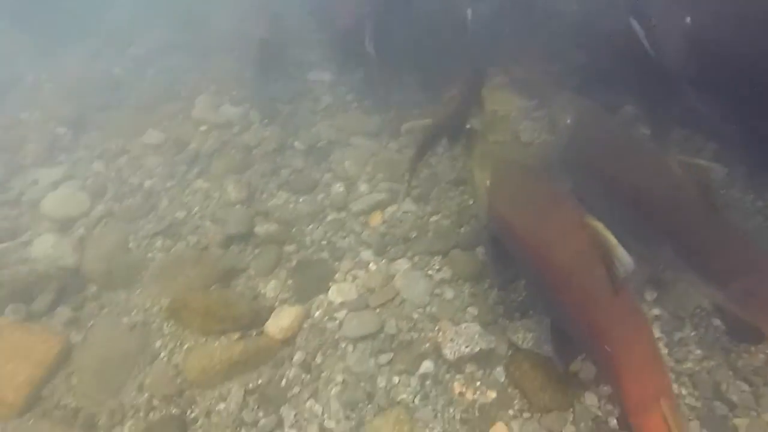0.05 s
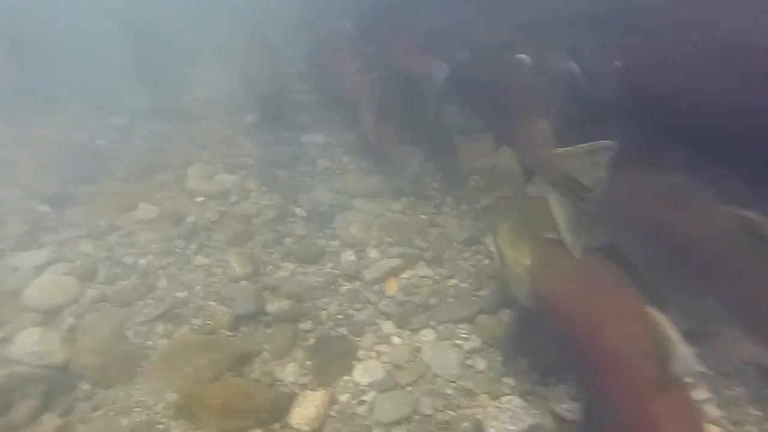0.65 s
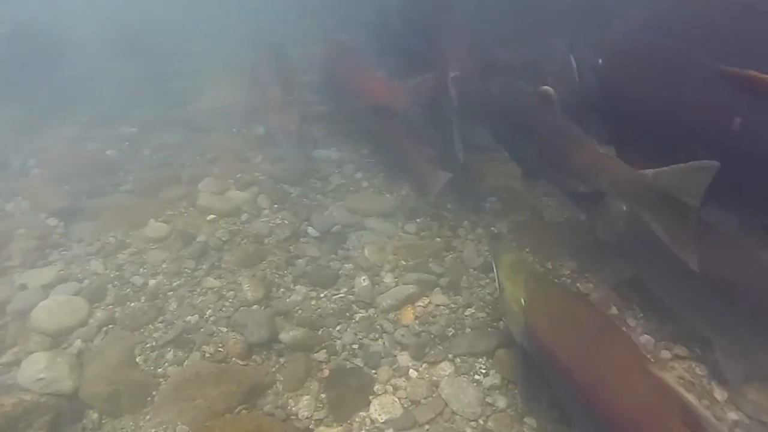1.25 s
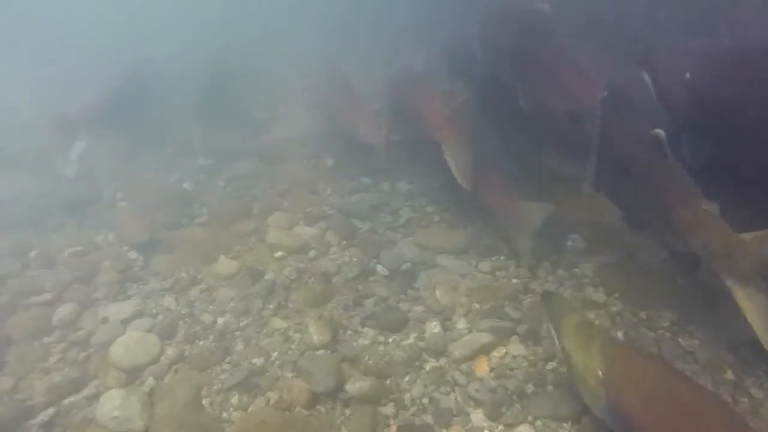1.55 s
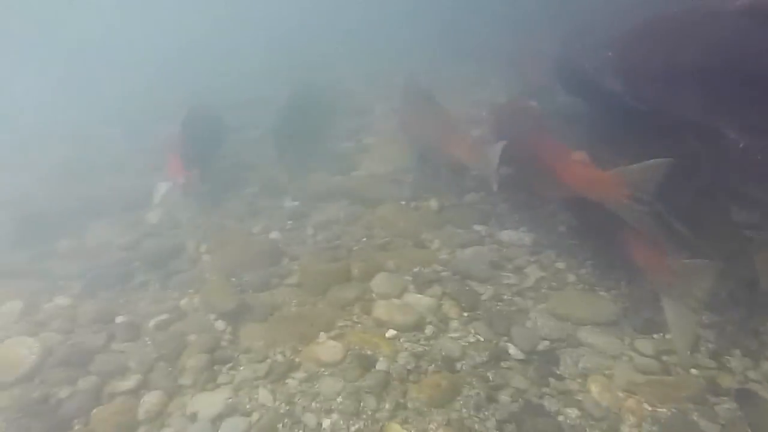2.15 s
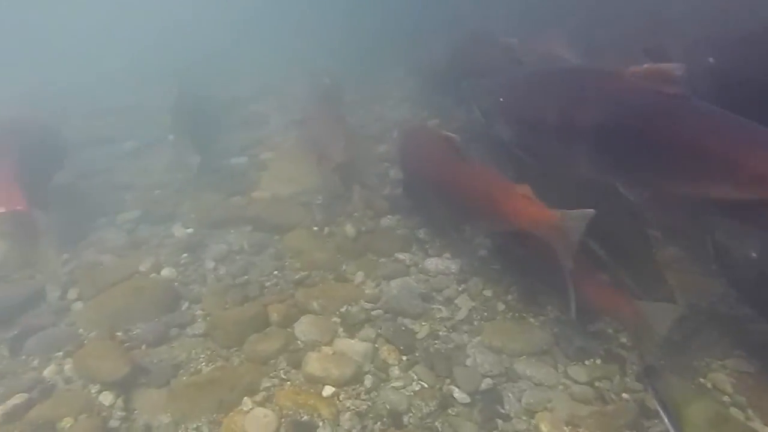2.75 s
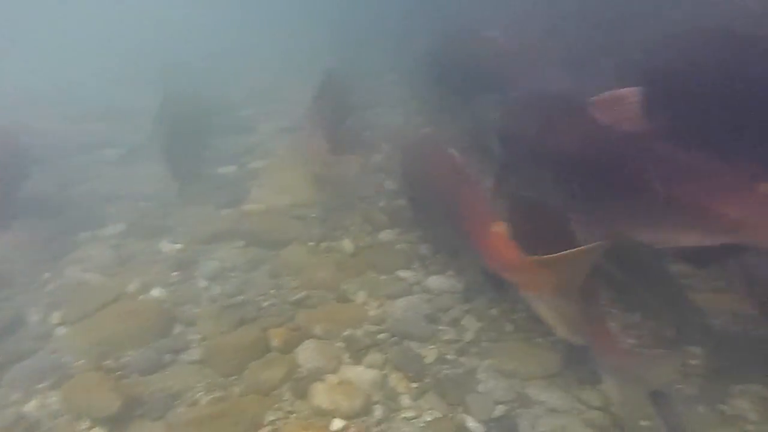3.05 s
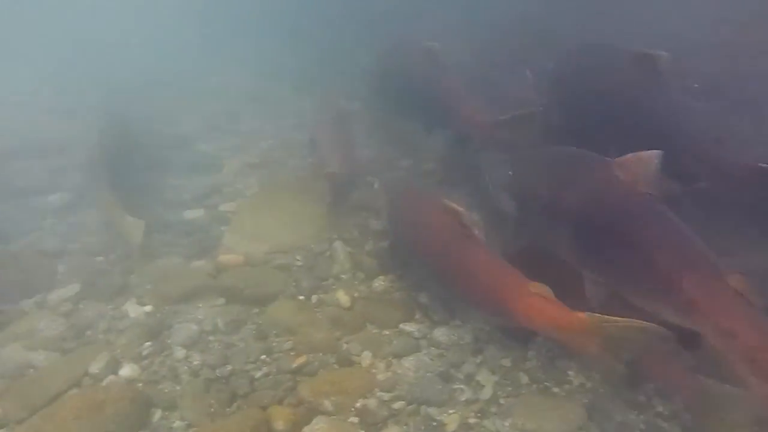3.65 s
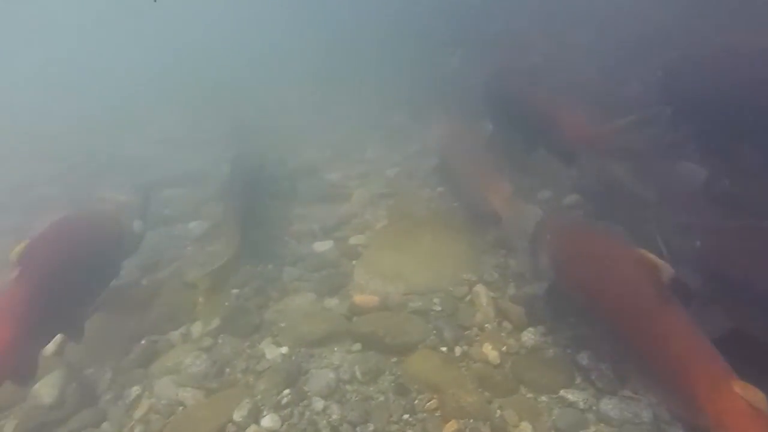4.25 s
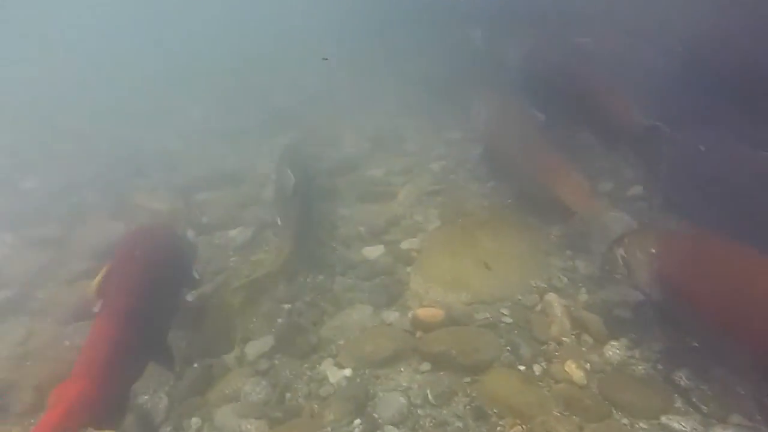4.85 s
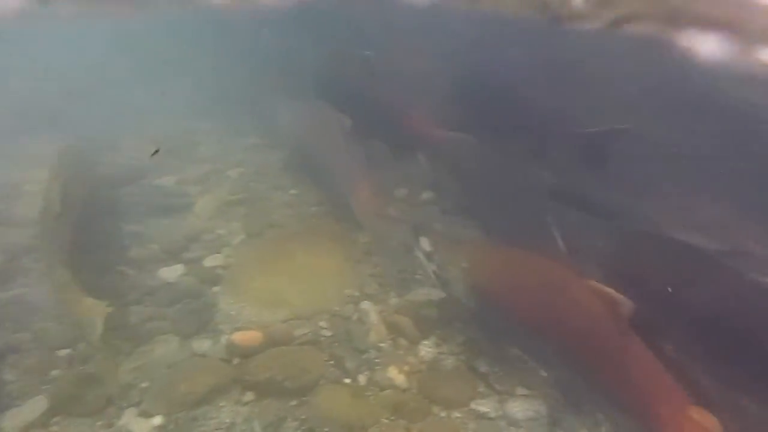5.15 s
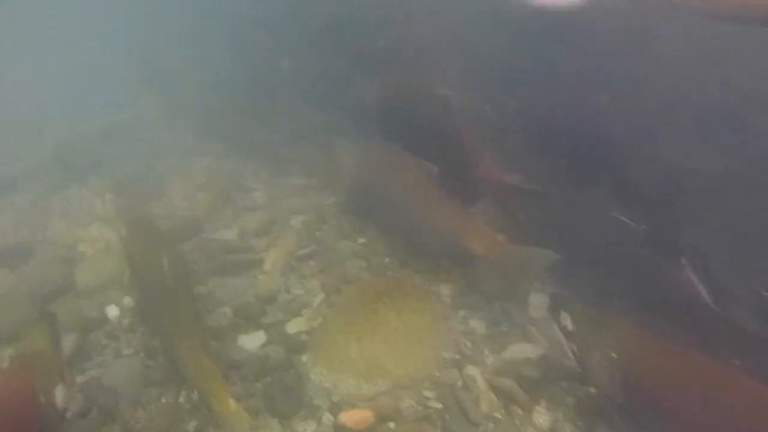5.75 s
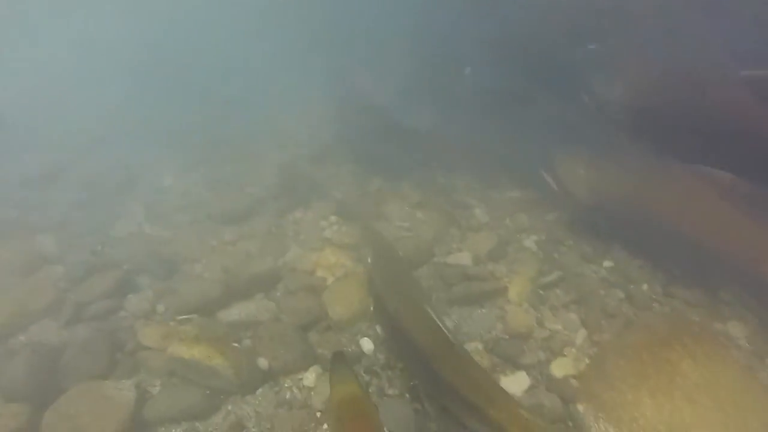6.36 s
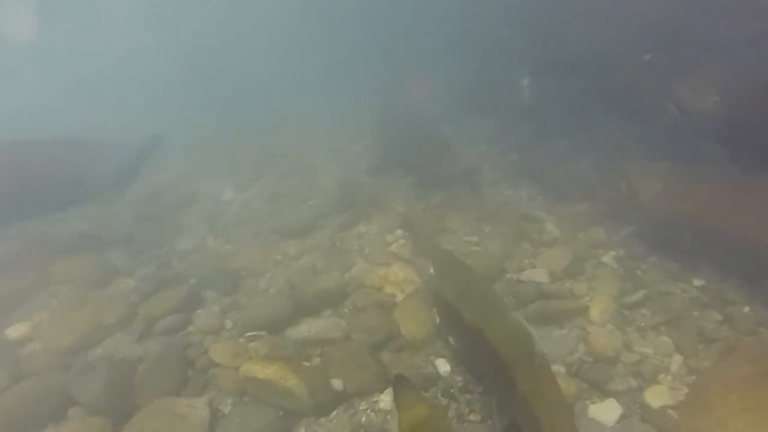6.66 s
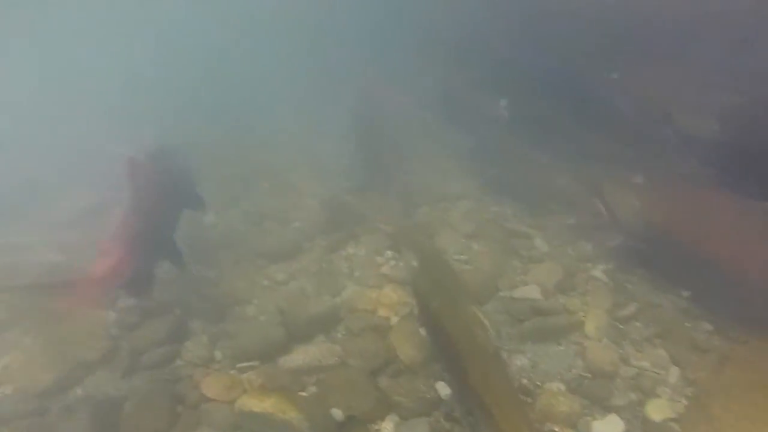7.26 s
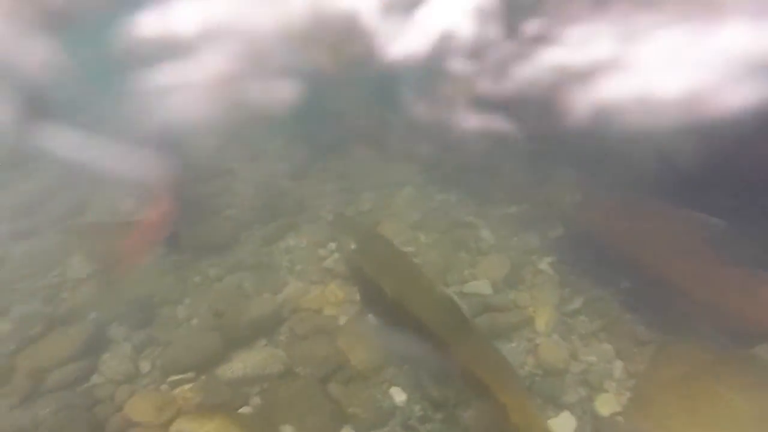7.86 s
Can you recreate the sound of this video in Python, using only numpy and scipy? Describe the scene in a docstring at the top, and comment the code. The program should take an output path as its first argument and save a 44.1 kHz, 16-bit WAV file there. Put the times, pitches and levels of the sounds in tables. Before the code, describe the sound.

In a shallow stream, heard from just under the surface, small bubbles plink, pop and tick close to the microphone, with a few deeper bloops. The waterproof housing gives one short creak early on. After that the surface starts to churn behind the bubbles, gurgling, fizzing and crackling in small swells. One sharp plink stands out late, and a faint hiss and low rumble lie underneath.

```python
"""A shallow gravel stream, the microphone in a waterproof housing held just under the surface.
Over a faint hiss and the low rumble of the current, bubbles begin to ring, pop, tick and bloop close by,
the housing ringing along. Just before 2 s the grip slips and the housing creaks once. Then the surface
starts to churn behind the close bubbles, and each wavelet stirs up a swarm that gurgles, fizzes and
crackles. The sharpest plink comes at 6 s; the rumble grows slowly to the end."""
import sys
import numpy as np
from scipy import signal
from scipy.fft import rfft, irfft
from scipy.io import wavfile
from scipy.ndimage import uniform_filter1d, minimum_filter1d

SR = 44100
rng = np.random.default_rng(int(sys.argv[2]) if len(sys.argv) > 2 else 0)


def inscribe(sig):
    """Save sig as 16-bit PCM at rate SR to the path in sys.argv[1].

    A 1-D sig is mono; a 2-D sig holds one channel per row.
    Samples are clipped to [-1, 1] before scaling.
    """
    pcm = np.round(np.clip(np.atleast_2d(sig).T, -1, 1) * 32767)
    wavfile.write(sys.argv[1], SR, pcm.astype(np.int16))


N = 348831


def bubble(hz, t60, rise=0, swell_cycles=1.0, push=0.14, push_hz=1000, linger_db=-24):
    """An air pocket swells into vibration, dies away and lingers; its pitch shifts near the surface."""
    t = np.arange(int(2 * t60 * SR) + 2) / SR
    cycles = hz * t * (1 + rise * (np.sqrt(t / t60) - 1 / 2))
    swell = 1 - np.exp(-(cycles / swell_cycles) ** 2)
    decay = from_db(-60 * t / t60) + from_db(linger_db - 20 * t / t60)
    # the closing neck shoves the water once: a dull pulse, stronger under large bubbles
    shove = push * push_hz / hz * cycles ** 2 * np.exp(2 - 2 * cycles)
    return np.sin(2 * np.pi * cycles) * swell * decay + shove


def snap(samples, low_hz, high_hz, decay_s=0.0015):
    """A film ruptures in a tiny burst of noise."""
    decay = np.exp(-np.arange(samples) / (decay_s * SR))
    return band_pass(decay * rng.standard_normal(samples), low_hz, high_hz)


def close_bubbles(table, t60_at_1khz, swell_cycles, snap_db, snap_reach, twin_db,
                  twin_gap_s=0.004, twin_octaves=0.52, twins=3):
    """Each bubble starts with a snap and sheds a few ever weaker twins that roughen its ring."""
    out = np.zeros(N)
    for s, db, hz in table:
        climbs, gaps, detunes = rng.random((3, twins))
        t60 = t60_at_1khz * (1000 / hz) ** 0.67  # small bubbles die sooner
        rise = 0.05 * climbs.mean() * 1000 / hz
        add(out, s, from_db(db) * bubble(hz, t60, rise, swell_cycles))
        add(out, s, from_db(db + snap_db) * snap(400, 180, 180 + snap_reach * hz))
        for k, (late, detune) in enumerate(zip(np.cumsum(gaps), detunes), 1):
            twin_hz = hz * 2 ** ((2 * detune - 1) * twin_octaves)
            twin = bubble(twin_hz, t60 / 2, swell_cycles=swell_cycles)
            add(out, s + late * twin_gap_s, from_db(db + twin_db * np.sqrt(k)) * twin)
    return out


# Ringing bubbles close to the microphone. Each row: start in seconds, level in dB, pitch in Hz.
PLINKS = [(0.548, -27, 1583), (0.601, -32.5, 2470), (0.694, -36, 1620), (0.731, -26.5, 2210),
          (0.908, -50, 1224), (1.625, -37, 1790), (1.674, -26.5, 2590), (2.004, -23.5, 2143),
          (2.023, -24, 1660), (2.193, -32, 3210), (2.308, -27.5, 2260), (2.488, -22.5, 2470),
          (2.543, -27, 2060), (2.726, -28.5, 2030), (2.753, -24.5, 2090), (2.836, -29.5, 2820),
          (3.109, -19, 1740), (3.17, -31, 1610), (3.492, -22, 1800), (3.597, -21.5, 2776),
          (3.636, -29, 1750), (3.728, -26, 1760), (3.761, -27.5, 1490), (3.783, -29.5, 2840),
          (4.084, -35.5, 1170), (4.158, -32, 1220), (4.209, -24.5, 1650), (4.312, -26, 2590),
          (5.069, -27.5, 3186), (5.174, -26, 1025), (5.21, -25, 2730), (5.328, -30.5, 2480),
          (5.676, -22, 2170), (5.69, -26, 896), (5.706, -27, 3445), (5.909, -24.5, 2100), (6.043, -8, 4190),
          (6.179, -32, 2410), (6.216, -30, 2020), (6.242, -28.5, 2020), (6.26, -27.5, 1333),
          (6.329, -25, 1266), (6.71, -26.5, 1694), (6.769, -38.5, 1630), (7.024, -21.5, 1797),
          (7.164, -20.5, 1930), (7.199, -23, 1894), (7.216, -21.5, 1150), (7.252, -30.5, 1185),
          (7.332, -27, 2690), (7.538, -20.5, 1894), (7.605, -25, 3240), (7.638, -26, 1570),
          (7.799, -21, 1715)]

def plinks():
    """Close bubbles swell over about a cycle and ring clearly."""
    return close_bubbles(PLINKS, t60_at_1khz=0.045, swell_cycles=1.02,
                         snap_db=-4.5, snap_reach=1.0, twin_db=-5.5)


# Bursting bubbles, just as close. Each row: start in seconds, level in dB, pitch in Hz.
DRY_POPS = [(0.645, -23.5, 2520), (0.792, -27, 5340), (0.958, -36, 2080), (1.485, -25.5, 3340),
            (1.739, -24.5, 1800), (1.769, -29, 1650), (1.801, -28.5, 2690), (2.423, -29, 1240),
            (2.432, -24, 1476), (2.541, -30.5, 964), (2.564, -23, 1650), (2.96, -28.5, 1455),
            (3.199, -33, 1250), (3.26, -34.5, 1640), (3.373, -29, 1260), (3.763, -24.5, 2740),
            (3.888, -31.5, 1320), (3.979, -23.5, 2260), (4.33, -23, 1240), (4.597, -24, 1890),
            (5.042, -25.5, 2640), (5.233, -18.5, 2390), (5.444, -21.5, 1060), (5.743, -28, 2250),
            (5.804, -30, 1260), (6.863, -32.5, 635), (7.757, -28.5, 1145), (7.903, -28, 2480)]

def pops():
    """Bubbles that burst at once: an abrupt start and a short ring."""
    return close_bubbles(DRY_POPS, t60_at_1khz=0.03, swell_cycles=0.29,
                         snap_db=-3.5, snap_reach=0.68, twin_db=-7)


# Tiny bubbles right at the housing. Each row: start in seconds, level in dB, pitch in Hz.
TINY_BUBBLES = [(0.4932, -46.5, 3740), (0.5894, -46.5, 6960), (0.6744, -42, 8900), (1.6843, -30, 4320),
                (1.711, -37, 4100), (1.77, -26, 4720), (2.4229, -33.5, 6830), (2.4582, -37, 7200),
                (2.823, -36, 9900), (2.962, -37.5, 4100), (3.1129, -37.5, 8930), (3.143, -41.5, 3980),
                (3.2, -38, 3740), (3.5835, -31.5, 5040), (3.6099, -30.5, 7800), (4.2176, -34.5, 6200),
                (4.2492, -32, 4860), (4.3788, -25, 6000), (4.551, -35, 5320), (5.08, -36.5, 6100),
                (5.284, -31, 5520), (5.591, -35.5, 2900), (5.7708, -38, 6300), (6.049, -28, 4900),
                (6.8835, -31.5, 4120), (7.829, -31.5, 9300), (7.8879, -33, 6250)]

def ticks():
    """The smallest bubbles snap brightly and barely ring."""
    return close_bubbles(TINY_BUBBLES, t60_at_1khz=0.037, swell_cycles=0.83,
                         snap_db=1.5, snap_reach=0.77, twin_db=-9.5)


# Large air pockets nearby. Each row: start in seconds, level in dB, pitch in Hz,
# ring time (t60) in seconds, glide as a share of the pitch (positive rises).
AIR_POCKETS = [(0.749, -40.5, 1130, 0.089, 0.37), (0.792, -42, 906, 0.066, -0.054),
               (0.959, -34, 1197, 0.077, -0.08), (1.78, -30, 510, 0.012, 0.14),
               (2.133, -31.5, 1086, 0.053, 0.35), (2.262, -20, 1204, 0.034, 0.19),
               (2.432, -41.5, 442, 0.086, 0.25), (2.541, -36.5, 553, 0.067, 0.26),
               (3.425, -41.5, 804, 0.174, -0.12), (3.637, -37, 577, 0.075, -.1),
               (3.676, -24, 882, 0.069, -0.098), (4.377, -29, 487, 0.13, 0.4),
               (4.466, -31, 704, 0.06, 0.15), (4.515, -21.5, 896, 0.07, 0.07),
               (5.676, -31.5, 690, 0.093, 1), (6.346, -18.5, 724, 0.041, 0.32),
               (6.394, -21.5, 1296, 0.065, 0.3), (6.503, -18, 1770, 0.039, -0.12)]

def bloops(twin_db=-9, twin_ratio=1.4):
    """Whole air pockets pinch off with a smaller twin, ring long and glide in pitch as they move."""
    out = np.zeros(N)
    for s, db, hz, t60, rise in AIR_POCKETS:
        add(out, s, from_db(db) * bubble(hz, t60, rise, push=0.11, linger_db=-51))
        add(out, s, from_db(db + twin_db) * bubble(hz * twin_ratio, t60 / 2))
        add(out, s, from_db(db - 12) * snap(SR // 100, 240, 2800))
    return out


# Wavelets folding air under, behind the close bubbles. Each row: crest time in seconds,
# length in seconds, gurgle level in dB, crackle level in dB.
SURFACE_WAVELETS = [(0.97, 0.28, -72.5, -79), (1.759, 0.071, -51.5, -53), (2.024, 0.095, -45, -77),
                    (2.38, 0.17, -51.5, -64), (4.357, 0.17, -42.5, -60), (4.68, 0.17, -47.5, -63.5),
                    (5.277, 0.28, -43, -57), (5.742, 0.12, -42.5, -53), (5.915, 0.06, -45.5, -55),
                    (6.099, 0.078, -41, -52.5), (7.624, 0.19, -47, -74), (7.792, 0.18, -47, -62)]

def churn(steady_db, crest_db, start_s=2.09, rise_s=0.37, settle_db_per_s=0.33):
    """Level in dB of the surface: churning sets in and slowly settles, with a swell for each wavelet."""
    t = np.arange(N) / SR
    since = t - start_s
    onset = (1 + np.tanh(2 * since / rise_s)) / 2
    power = from_db(steady_db - settle_db_per_s * since) ** 2 * onset
    for (s, length, *_), db in zip(SURFACE_WAVELETS, crest_db):
        bell = np.exp(-np.minimum((2 * (t - s) / length) ** 2, 20))
        power += from_db(db) ** 2 * bell
    return 10 * np.log10(power)


def spurts(depth_db, per_s=45):
    """Air is drawn under in brief spurts: a random level in dB, at unit mean power."""
    knots = rng.uniform(-1, 1, N // 100)
    db = depth_db * np.interp(np.arange(N) / SR * per_s, np.arange(len(knots)), knots)
    return db - 10 * np.log10(np.mean(from_db(db) ** 2))


def swarm(level_db, spectrum, peak_per_s, spread_db, ring_cycles, swell_cycles, crowding, count=7000):
    """Bubbles come at random; stronger churning makes them both more frequent and louder."""
    out = np.zeros(N)
    seconds = N / SR
    when, luck, vigour, pitch, sustain, climb = rng.random((count, 6)).T
    level = level_db[(when * N).astype(int)]
    rate = np.minimum(peak_per_s * from_db(crowding * (level - level_db.max())), count / seconds)
    low_hz, high_hz = spectrum[0][0], spectrum[-1][0]
    hz = low_hz * (high_hz / low_hz) ** pitch
    t60 = ring_cycles / hz * 2 ** (2 * sustain - 1)
    # many faint ones, few strong ones; together they carry the given level
    strength = rms_one(from_db(at_hz(spectrum, hz) + spread_db * vigour ** 2))
    peak = from_db(level) * strength * np.sqrt(4 * np.log(1000) / (t60 * rate))
    for k in np.flatnonzero(luck < rate * seconds / count):
        ring = bubble(hz[k], t60[k], (climb[k] - 0.5) / 10, swell_cycles, push=0.21)
        add(out, when[k] * seconds, peak[k] * ring)
    return out


# The gurgle around the housing. Each row: pitch in Hz, relative strength in dB.
GURGLE_SPECTRUM = [(450, -5), (1200, 14.5), (2100, 16), (3300, 2.5)]

def gurgle(crest_db):
    """The larger bubbles of the churning surface ring over one another."""
    level_db = churn(-51.5, crest_db) + spurts(depth_db=7)
    return swarm(level_db, GURGLE_SPECTRUM, peak_per_s=800, spread_db=22.5,
                 ring_cycles=41.5, swell_cycles=0.53, crowding=0.34)


# The crackle around the housing. Each row: pitch in Hz, relative strength in dB.
CRACKLE_SPECTRUM = [(3500, -41.5), (5500, 15.5), (10500, 10), (13500, -32)]

def crackle(crest_db):
    """The small bubbles of the churning surface ring high and die within milliseconds."""
    level_db = churn(-68.5, crest_db) + spurts(depth_db=11)
    return swarm(level_db, CRACKLE_SPECTRUM, peak_per_s=700, spread_db=38,
                 ring_cycles=19, swell_cycles=1.1, crowding=0.45)


# The fine fizz in the background. Each row: pitch in Hz, relative strength in dB.
FIZZ_SPECTRUM = [(1400, -1), (2600, 2), (4000, -5.5), (11000, -29)]

def fizz(crest_db, spread_db=17, width=0.11, bands=24, per_band=1500):
    """Thousands of tiny, faint bubbles merge into a fine wash; each pitch gets its own random births."""
    level_db = churn(-67, crest_db) + spurts(depth_db=19)
    out = np.zeros(N)
    for hz in np.geomspace(FIZZ_SPECTRUM[0][0], FIZZ_SPECTRUM[-1][0], bands):
        strengths = rng.standard_normal(per_band) * from_db(spread_db * rng.random(per_band))
        births = np.bincount(rng.integers(N, size=per_band), strengths, N)
        rings = resonance(resonance(births, hz, width * hz), hz, width * hz)
        out += from_db(at_hz(FIZZ_SPECTRUM, hz)) * rms_one(rings)
    return from_db(level_db) * rms_one(out)


# Slips of the grip on the housing itself. Each entry: start in seconds.
SLIP_TIMES = [1.891, 1.9002, 1.912, 1.9229, 1.938, 1.951, 1.9653, 1.9772]

def creak(db=-20.5, slip_hz=1803, t60=0.018, shell_hz=545, shell_db=-9, catch_s=0.00273, catch_db=-7):
    """The grip slips in an uneven stutter; each slip knocks the shell and catches again."""
    out = np.zeros(N)
    for s in SLIP_TIMES:
        late, detune, grip = rng.uniform(-0.3, 0.3, 3)
        hz = slip_hz * (1 + grip / 2)
        add(out, s, from_db(db) * bubble(hz, t60, push=0))  # with no push, a plain damped ring
        add(out, s, from_db(db + shell_db) * bubble(shell_hz, t60, push=0))
        add(out, s, from_db(db - 15.5) * snap(SR // 100, 1500, 4640))
        catch = bubble(hz * 2 ** detune, t60, push=0)
        add(out, s + catch_s * (1 + late), from_db(db + catch_db) * catch)
    return out


# Resonances of the shell around the microphone. Each row: pitch in Hz, gain in dB.
HOUSING_MODES = [(600, -10), (920, -18.5), (1340, -9.5), (2650, -12)]

def housing(x, width_hz=45):
    """The shell and its air space ring faintly after every bubble."""
    return x + sum(from_db(db) * resonance(x, hz, width_hz) for hz, db in HOUSING_MODES)


def gravel_scatter(x, tail_db=-15, t60=0.015, top_hz=3000):
    """Scattering between the gravel and the rippled surface leaves a soft, short tail."""
    t = np.arange(SR // 4) / SR
    tail = band_pass(rng.standard_normal(len(t)), 280, top_hz) * from_db(-60 * t / t60)
    tail *= np.sqrt(2 * top_hz / SR / np.sum(tail ** 2))  # about unit gain within its band
    return x + from_db(tail_db) * signal.fftconvolve(x, tail)[:N]


def current(final_db=-64, growth_db_per_s=2.0):
    """Eddies press on the housing, harder and harder as it nears the surface."""
    eddies = rms_one(band_pass(rng.standard_normal(N), 7.4, 64.0))
    return eddies * from_db(final_db + growth_db_per_s * (np.arange(N) - N) / SR)


# Steady hiss at the microphone. Each row: frequency in Hz, relative density in dB.
HISS_SPECTRUM = [(30, -2), (280, -3.5), (1100, -12), (2100, -12.5), (3800, -18.5), (16000, -37)]

def hiss(level_db=-77):
    """A faint even hiss, coloured by the housing."""
    hz = np.maximum(np.fft.rfftfreq(N, 1 / SR), 1)
    spectrum = rfft(rng.standard_normal(N)) * from_db(at_hz(HISS_SPECTRUM, hz))
    return from_db(level_db) * rms_one(irfft(spectrum, N))


def from_db(db):
    return 10 ** (np.asarray(db) / 20)


def rms_one(x):
    return x / np.sqrt(np.mean(x ** 2) + 1e-20)


def at_hz(points, hz):
    """Read a spectrum on a log-frequency axis."""
    known_hz, db = np.transpose(points)
    return np.interp(np.log(hz), np.log(known_hz), db)


def add(out, s, sound):
    """Mix a short sound in at time s."""
    start = int(np.clip(s * SR, 0, N))
    out[start:start + len(sound)] += sound[:N - start]


def band_pass(x, low_hz, high_hz):
    """Second-order Butterworth edges."""
    sos = signal.butter(2, [low_hz, min(high_hz, SR / 2 - 1)], "band", fs=SR, output="sos")
    return signal.sosfilt(sos, x + 1e-18)


def resonance(x, hz, width_hz):
    """A ringing band with gain 1 at its centre."""
    return signal.lfilter(*signal.iirpeak(hz, hz / width_hz, fs=SR), x + 1e-18)


def scene():
    """One microphone just under the surface hears all the bubbles through its housing."""
    _, _, gurgle_db, crackle_db = np.transpose(SURFACE_WAVELETS)
    close = plinks() + pops() + ticks()
    surface = gurgle(gurgle_db) + crackle(crackle_db) + fizz(gurgle_db - 1.5)
    water = gravel_scatter(housing(close + bloops() + surface + creak()))
    return (band_pass(water, 74, 20000) + current() + hiss())[None]


def record(dry, ceiling_db=-19.5, release_db_per_s=900, stopband_hz=16500):
    """A fast limiter holds the loudest plinks down; the top is cut."""
    recovery = release_db_per_s * np.arange(N) / SR
    over_db = np.maximum(20 * np.log10(np.abs(dry[0]) + 1e-9) - ceiling_db, 0)
    held_db = np.maximum.accumulate(over_db + recovery) - recovery
    gain_db = uniform_filter1d(minimum_filter1d(-held_db, size=41), size=41)
    low_pass = signal.cheby2(12, 60, stopband_hz, fs=SR, output="sos")
    return signal.sosfilt(low_pass, dry * from_db(gain_db))


dry = scene()
out = record(dry)
inscribe(out)
```